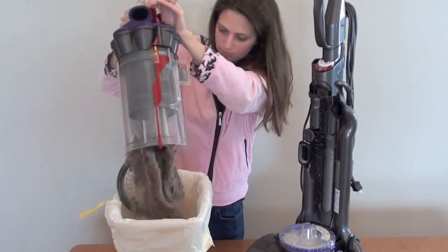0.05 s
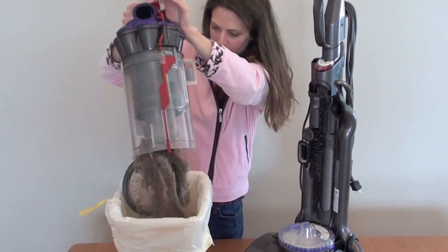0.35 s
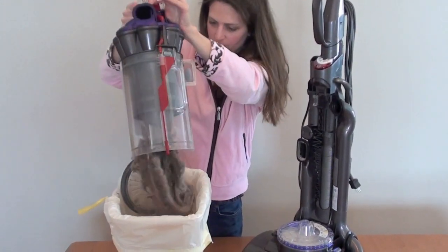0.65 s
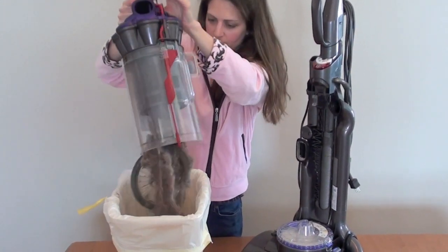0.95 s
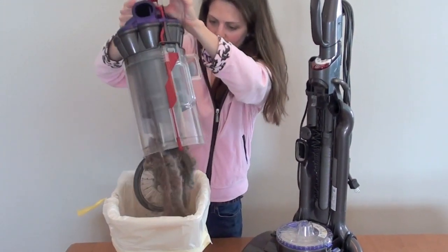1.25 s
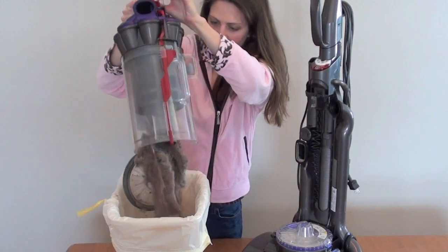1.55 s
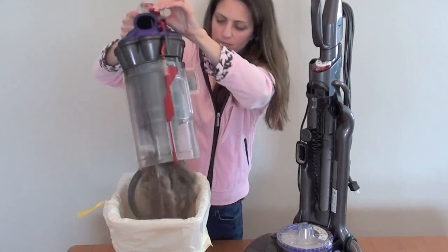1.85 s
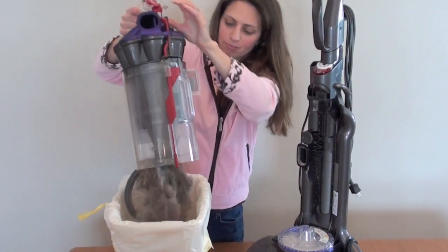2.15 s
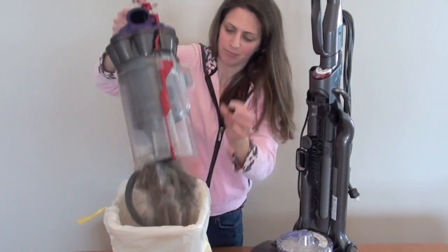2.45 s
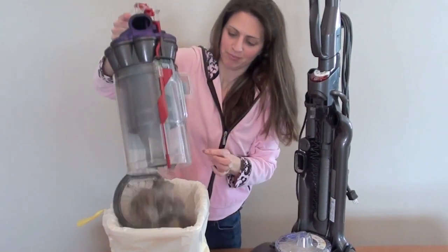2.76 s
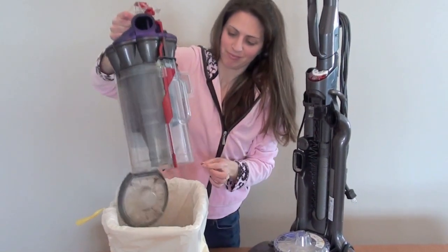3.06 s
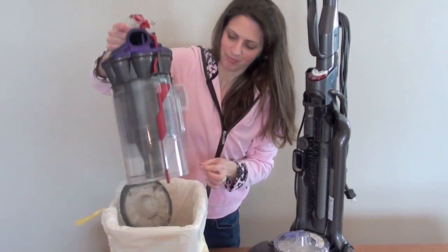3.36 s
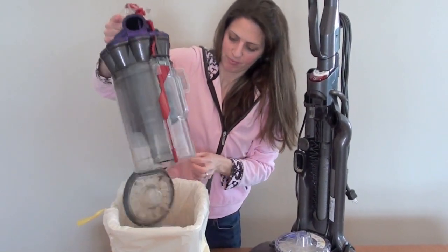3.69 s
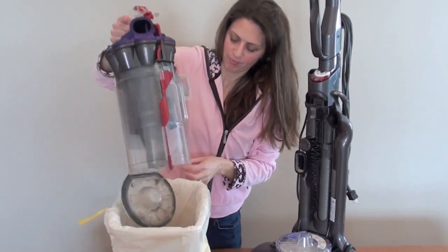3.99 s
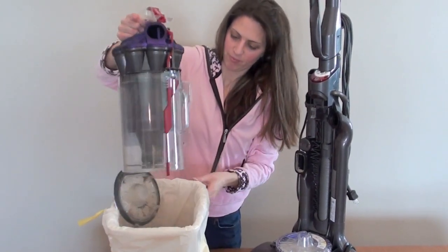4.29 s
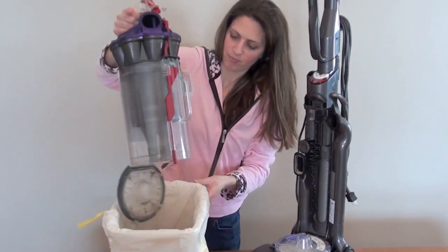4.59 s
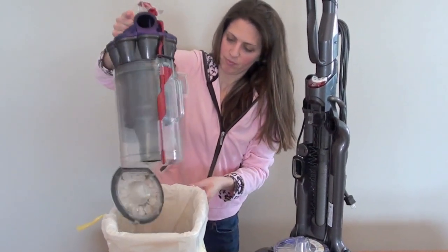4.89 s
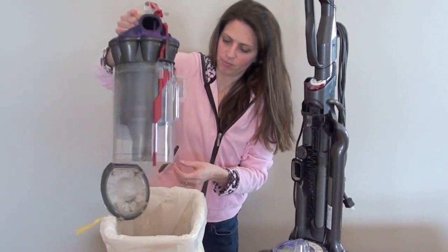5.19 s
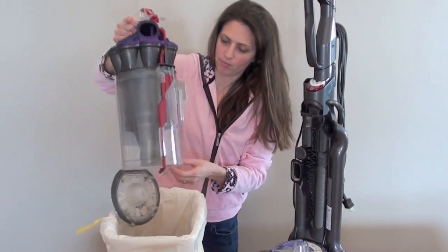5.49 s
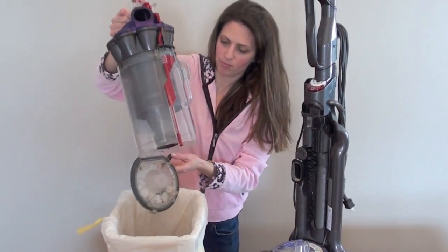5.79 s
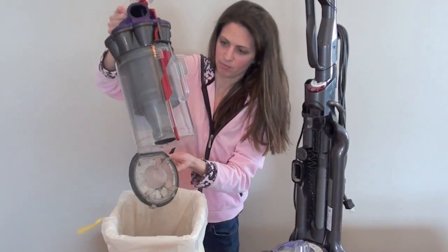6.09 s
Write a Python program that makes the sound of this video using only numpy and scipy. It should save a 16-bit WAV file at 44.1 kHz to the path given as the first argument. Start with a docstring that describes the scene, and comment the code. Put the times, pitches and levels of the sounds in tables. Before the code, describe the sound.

In a small, bare room, a hand thumps a vacuum cleaner's plastic bin while a clump of dust and hair hisses into a lined trash can. The catch snaps sharply several times and the open flap knocks and scrapes between further slaps. Then come eight hard, even slaps, each with a hollow boom and a rattle of loose parts. The handling, slightly left of the microphone, stops and leaves quiet room air.

```python
"""A small, bare room; a vacuum cleaner's plastic bin is emptied into a lined trash can, just left of the mic.
First a hand slaps the bin, its low modes boom, and a big clump of dust and hair hisses into the liner.
Then, between more slaps, fingers squeak, the catch snaps and the open flap knocks and scrapes.
From about 4 s come eight hard slaps; each frees a puff of dust and rattles the loose parts.
The handling stops, leaving room air and a faint high whine."""
import sys
import numpy as np
from scipy import signal
from scipy.fft import rfft, irfft, next_fast_len
from scipy.io import wavfile

SR = 44100
rng = np.random.default_rng(int(sys.argv[2]) if len(sys.argv) > 2 else 0)


def dump(signal):
    """Clip the signal to [-1, 1] and save it as 16-bit WAV at the path in sys.argv[1]."""
    limited = np.clip(np.atleast_2d(signal).T, -1, 1)
    pcm = np.round(limited * 32767).astype(np.int16)
    wavfile.write(sys.argv[1], SR, pcm)


N = 275184
TIME = np.arange(N) / SR
AGE = np.arange(int(.6 * SR)) / SR  # time since a blow, s
BRIEF = AGE[:SR // 6]  # the same, for short sounds

# hand blows on the bin: t/s, boom level/dB, smack level/dB
HAND_SLAPS = [(0.1383, -26, -28.5), (.354, -29.5, -35), (0.5421, -30.5, -33), (1.818, -24, -27.5),
              (2.0721, -28.5, -35.5), (2.8616, -38.5, -36), (3.055, -32, -32), (3.4964, -30.5, -35),
              (3.9457, -21.5, -22.5), (4.191, -25, -25.5), (4.3706, -25, -28), (4.6139, -22.5, -25),
              (4.855, -22, -22), (5.0834, -23, -22), (5.2849, -21.5, -21.5), (5.5038, -22, -24)]
# the catch snapping over: t/s, level/dB, hardness (0 dull, 1 or more sharp), lead of first touch/s
CATCH_SNAPS = [(1.7574, -13, 1.25, 0.013), (2.5473, -11, 0.97, 0.0058), (3.6027, -18, 1.18, .0175),
               (3.7843, -19.5, 1, 0.0094)]
# knocks of the flap and other loose parts: t/s, level/dB, hardness
FLAP_KNOCKS = [(0.169, -27, 1.67), (.785, -35.5, .9), (0.8165, -43.5, 2.3), (0.9168, -27.5, .2),
               (0.9816, -26.5, 0.14), (1.0056, -26.5, .1), (1.1375, -16, 0.12), (1.448, -27.5, 0.68),
               (1.6689, -29.5, 0.71), (1.9254, -12.5, 0.71), (2.0456, -27, 0.019), (2.2126, -12, 0.14),
               (2.4157, -37, 1.72), (2.7685, -18.5, 0.54), (2.7764, -20.5, 0.67), (2.8838, -24.5, 0.93),
               (2.979, -20.5, 0.27), (3.0229, -33.5, 1.76), (3.0733, -29.5, 1.5), (3.0869, -27.5, 1.57),
               (3.3637, -29.5, 1.04), (3.4359, -19, 0.37), (3.4450, -21.5, 0.36), (3.648, -18, 0.91),
               (3.8508, -13, 0.77)]
# plastic juddering on plastic: t/s, rise time/s, level/dB, hardness
PART_SCRAPES = [(1.681, 0.02, -35, 0.24), (1.756, 0.0066, -16, 0.98), (1.765, 0.036, -23.5, 0.69),
                (2.19, 0.01, -29.5, .15), (2.622, 0.029, -33, 0.67), (2.768, 0.0054, -24, 0.83),
                (2.978, 0.0087, -42, 0.34), (3.342, 0.033, -35, 0.67), (3.437, 0.0044, -28, 0.38),
                (3.6, 0.031, -25.5, 0.76), (3.79, 0.027, -25.5, 0.83), (3.838, 0.0092, -24, 0.81)]
# clumps of dust and hair sliding out: t/s, length/s, level/dB
DUST_SLIDES = [(0.145, 1.59, -34.5), (1.85, 3.9, -46), (2.93, 0.63, -45.5), (4.45, 1.3, -45.5)]
# fingers slipping on the plastic: t/s, half length/s, f/Hz, width/Hz, level/dB
FINGER_SLIPS = [(0.918, 0.029, 1340, 260, -42.5), (0.975, 0.03, 680, 280, -43.5),
                (1.476, 0.02, 3330, 256, -48), (1.525, .03, 6800, 1800, -45.5)]
# soft low rustle under and between the blows: t/s, relative level/dB
RUSTLE_LEVELS = [(0.0, -34.5), (0.38, -44), (1.73, -57), (1.9, -34), (2.5, -43), (2.92, -40.5), (3.38, -45),
                 (3.6, -37.5), (3.89, -38.5), (4.6, -53), (5.42, -34), (5.9, -40)]
# low modes of the bin and the room around it: f/Hz, relative level/dB, t60/s
BOOM_MODES = [(88, -5, 0.47), (121, -1, 0.22), (131.6, -8, 0.095), (143.7, -4.5, 0.39), (179.8, -3.5, 0.27),
              (188, -12, 0.046), (206, -2.5, 0.12), (224.4, 0.5, 0.14), (234.4, -5.5, 0.42),
              (251, -13, 0.62), (284.8, -6, 0.41), (311, -13, 1), (463.4, -8.5, 0.69)]
# resonances of the bin's wall: f/Hz, width/Hz, weight/dB (compressed in shell)
SHELL_MODES = [(668, 96, -18), (1390, 100, -18), (1900, 230, 6), (2815, 136, -16), (3420, 24, -31),
               (4240, 280, 8), (5150, 150, -22), (5470, 240, -24), (7300, 500, 26), (8020, 590, -8)]
# reverberation of the room: f/Hz, t60/s
ROOM_DECAY = [(150, 0.61), (500, 0.61), (2000, 0.59), (5000, 0.41), (9000, 0.35), (16000, 0.4)]

# spectra and filter curves, all: f/Hz, relative level/dB
PALM_COUPLING = [(30, -5), (62, -14.5), (80, -23.5), (110, 0.5), (240, 2.5), (330, -10.5), (480, -9.5),
                 (900, -44), (2000, -61)]  # share of the boom that a soft palm excites and the bin radiates
SMACK_SPECTRUM = [(150, -26), (330, -3.5), (450, -1.5), (530, -8), (660, 0.5), (850, -2), (1100, -4.5),
                  (1400, -6.5), (2500, -9.5), (6000, -74)]  # palm on the wall
CRACK_SPECTRUM = [(200, 0), (700, -7.5), (1200, 4), (2000, 10), (3000, 8), (4200, 1), (7700, 3),
                  (10000, -7), (16000, -21)]  # loose parts jolted by a slap
RATTLE_SPECTRUM = [(150, -15.5), (400, -2), (1000, -8.5), (1900, -0.5), (2800, -1), (3500, -9), (6000, -5),
                   (7900, -4), (10000, -12), (16000, -29.5)]  # loose parts bouncing afterwards
CONTACT_SPECTRUM = [(100, -20), (400, -11), (700, -4.5), (1100, 4), (1900, 4.5), (2900, 5.5), (3600, -1),
                    (5500, -3), (7800, -3.5), (10000, -13), (16000, -33)]  # plastic on plastic
DULL_COLOUR = [(420, -2), (660, 11.5), (850, 3), (1100, 2), (2700, -6), (6500, -6), (13000, -14.5)]  # a contact of hardness 0
SHARP_COLOUR = [(420, 0), (660, -5.5), (850, -11), (1100, -2.5), (2700, -1), (6500, 3.5), (13000, 6)]  # a contact of hardness 1
DUST_SPECTRUM = [(500, -4), (2000, 2), (4000, -0.5), (7500, 4.5), (10000, -3.5), (16000, -21.5)]  # dust and grit landing in the liner
RUSTLE_SPECTRUM = [(90, -10), (230, 6.5), (330, -0.5), (650, -3.5), (1400, -3), (2200, -6), (4000, -9.5),
                   (9000, -16.5)]  # the soft low rustle
WALL_RETURN = [(5000, 0.5), (8500, -3.5), (11000, -8.5), (15000, -45)]  # share that the room's walls send back
AIR_SPECTRUM = [(25, 12), (55, -7), (120, 0.5), (250, 4), (600, 0), (2000, -5), (7000, -5), (10000, -11),
                (16000, -12.5)]  # room tone
TICK_SPECTRUM = [(3000, -15), (10000, 5), (16000, -21)]  # first instant of a contact
BASS_LOSS = [(40, -10), (130, -1)]  # a small, light wall radiates little bass


def slaps(full_smack_db=-21.5, full_crack_db=-21.5, full_rattle_db=-20.5):
    """The palm smacks the wall, the low modes boom, the loose parts crack and, after hard blows, rattle."""
    booms, blows = np.zeros(N), np.zeros(N)
    for start, boom_db, smack_db in HAND_SLAPS:
        force_db = smack_db - full_smack_db  # 0 for a full blow
        add(booms, start, amp(boom_db) * held(boom(force_db), 0.088))
        smack = shell(impact(.018, .07, ring_db=-9), SMACK_SPECTRUM)
        smack = bent(smack, lag=.007, corner_hz=480)
        crack = shell(impact(0.0072, 0.24, ring_db=-18.5), CRACK_SPECTRUM)
        rattle = chatter(rise=0.032, rate=600, spectrum=RATTLE_SPECTRUM)
        add(blows, start, amp(smack_db) * held(smack, 0.026))
        add(blows, start, amp(full_crack_db + 1.11 * force_db) * held(crack, 0.019))
        add(blows, start, amp(full_rattle_db + 2.18 * force_db) * held(rattle, 0.05))
    return booms, blows


def boom(force_db):
    """The low modes ring under the palm, in a slightly different balance each time."""
    modes = sum(amp(db + rng.normal(0, 1)) * fade(t60) * np.cos(2 * np.pi * hz * AGE)
                for hz, db, t60 in BOOM_MODES)
    depth = [(125, 2.5 + 0.39 * force_db), (200, 0)]  # sharper blows also shake the deepest modes
    thud = coloured(modes, lambda hz: along(PALM_COUPLING, hz) + along(depth, hz))
    return bent(thud, lag=0.01337, corner_hz=600)


def catch_and_flap(touch_db=-5.5, touch_softer=0.17):
    """The catch touches lightly and snaps, the flap knocks against the bin, sliding parts judder."""
    out = np.zeros(N)
    for start, db, hardness, lead in CATCH_SNAPS:
        add(out, start - lead, amp(db + touch_db) * contact(hardness - touch_softer))
        add(out, start, amp(db) * contact(hardness))
    for start, db, hardness in FLAP_KNOCKS:
        add(out, start, amp(db) * contact(hardness))
    for start, rise, db, hardness in PART_SCRAPES:
        judder = chatter(rise, rate=1000, spectrum=CONTACT_SPECTRUM)
        add(out, start, amp(db) * held(hardened(judder, hardness), rise))
    return out


def contact(hardness):
    """Plastic strikes plastic and rings briefly; the highest treble is only in the first instant."""
    ring = shell(impact(0.0079, 0.059, ring_db=6.5), CONTACT_SPECTRUM)
    tick = coloured(impact(0.0085, .04, ring_db=-30), lambda hz: along(TICK_SPECTRUM, hz))
    return hardened(held(ring, 0.0028), hardness) + amp(-19.5) * held(tick, 0.002)


def impact(crack_t60, ring_t60, ring_db, attack_s=0.00053):
    """A very short crack, then the dense ringing of the plastic."""
    envelope = fade(crack_t60, BRIEF) + amp(ring_db) * fade(ring_t60, BRIEF)
    return rng.standard_normal(len(BRIEF)) * envelope * (1 - np.exp(-BRIEF / attack_s))


def chatter(rise, rate, spectrum, contact_t60=0.01, steepness=1.44):
    """Loose parts bounce in a flurry that swells and dies; each contact rings for an instant."""
    progress = (BRIEF / rise) ** steepness
    bounces = grains(len(BRIEF), rate, spread_db=0) * progress * np.exp(-progress)
    power = signal.lfilter([1], [1, -fade(contact_t60, 1 / SR) ** 2], bounces ** 2)
    return shell(np.sqrt(power) * rng.standard_normal(len(BRIEF)), spectrum)


def hardened(x, hardness):
    """A soft contact sounds hollow, a hard one thin and bright."""
    softness = 1 - hardness
    return coloured(x, lambda hz: softness * along(DULL_COLOUR, hz) + hardness * along(SHARP_COLOUR, hz))


def shell(x, spectrum, limit_db=4):
    """The bin's wall radiates a broad colour, its resonances standing out by up to limit_db."""
    def gain_db(hz):
        peaks = sum(amp(weight / 4) * resonance(hz, centre, width) for centre, width, weight in SHELL_MODES)
        return along(spectrum, hz) + along(BASS_LOSS, hz) + limit_db * np.tanh(6 * peaks / limit_db)
    return coloured(x, gain_db)


def bent(x, lag, corner_hz):
    """Bending waves are slower at low pitch, so the thud arrives up to lag seconds after the crack."""
    return filtered(x, lambda hz: np.exp(-2j * np.pi * lag * corner_hz * np.arctan(hz / corner_hz)))


def dust(grit_db=3, puff_s=0.3, puff_db=-32.5):
    """Dust hisses into the liner with grit ticking in it: whole clumps, and a puff after each slap."""
    puffs = [(start, puff_s, smack_db + puff_db) for start, _, smack_db in HAND_SLAPS]
    power = sum((amp(db) * slide(start, length)) ** 2 for start, length, db in list(DUST_SLIDES) + puffs)
    hiss = unit(rng.standard_normal(N))
    grit = amp(grit_db) * unit(grains(N, rate=380, spread_db=5))
    return np.sqrt(power) * unit(coloured(hiss + grit, lambda hz: along(DUST_SPECTRUM, hz)))


def slide(start, length, attack_s=0.013, taper=1.57):
    """Flow of one lot of dust: a quick start, then it runs dry."""
    age = np.maximum(TIME - start, 0)
    return (1 - np.exp(-age / attack_s)) * np.maximum(1 - age / length, 0) ** taper


def rustle(trim_db=-8):
    """Soft low rustle under and between the blows: lingering ring and handling noise."""
    level_db = np.interp(TIME, *np.transpose(RUSTLE_LEVELS)) + trim_db
    texture = grains(N, rate=3000, spread_db=0)
    return amp(level_db) * unit(shell(texture, RUSTLE_SPECTRUM))


def squeaks():
    """Fingers slip on the plastic in brief, thin squeals that swell and fade."""
    out = np.zeros(N)
    middle = AGE[-1] / 2
    for peak_time, half_length, centre, width, db in FINGER_SLIPS:
        tone = filtered(rng.standard_normal(len(AGE)), lambda hz: resonance(hz, centre, width))
        swell = np.exp(-((AGE - middle) / half_length) ** 2)
        add(out, peak_time - middle, amp(db) * held(tone * swell, half_length))
    return out


def room(x, wet_db, side_db, stretches=14):
    """The walls answer almost alike on both channels; a fresh random tail per stretch keeps it smooth."""
    mid, side = np.zeros(N), np.zeros(N)
    for span in np.array_split(np.arange(N), stretches):
        for track, tail in zip((mid, side), room_tail()):
            add(track, span[0] / SR, signal.fftconvolve(x[span], tail))
    pair = np.array([mid + amp(side_db) * side, mid - amp(side_db) * side])
    return filtered(pair, lambda hz: amp(wet_db + along(WALL_RETURN, hz)))


def room_tail(build_s=0.00067):
    """Mid and side reverberation, each frequency dying at its own speed."""
    hz, t, bands = signal.stft(rng.standard_normal((2, len(AGE))), SR, nperseg=256)
    bands = bands * fade(along(ROOM_DECAY, hz)[:, None], t)
    tails = signal.istft(bands, SR, nperseg=256)[1][:, :len(AGE)]
    tails = tails * (1 - np.exp(-AGE / build_s))
    return tails / np.linalg.norm(tails[0])


def room_tone(air_db=-53, whine_db=-64.5, whine_hz=8380):
    """Quiet room air and a faint, wavering high whine."""
    mid, side = [unit(coloured(rng.standard_normal(N), lambda hz: along(AIR_SPECTRUM, hz)))
                 for _ in range(2)]
    air = np.array([mid + amp(-12.5) * side, mid - amp(-10) * side])
    whine = unit(filtered(rng.standard_normal(N), lambda hz: resonance(hz, whine_hz, width=70)))
    return amp(air_db) * air + amp(whine_db) * whine


def amp(db):
    """Decibels to gain."""
    return 10 ** (np.asarray(db) / 20)


def unit(x):
    """Scale to rms 1."""
    return x / np.sqrt(np.mean(x ** 2) + 1e-20)


def held(x, seconds):
    """Scale a blow to the energy of rms 1 held for so long."""
    return x / np.sqrt(np.sum(x ** 2) / (seconds * SR) + 1e-20)


def fade(t60, t=AGE):
    """Exponential decay, 60 dB in t60 seconds."""
    return np.exp(-np.log(1000) * t / t60)


def resonance(hz, centre, width):
    """A peak of height 1, width Hz wide at half height."""
    return 1 / (1 + (2 * (hz - centre) / width) ** 2)


def along(points, hz):
    """Read a curve of (f/Hz, value) points on a log frequency axis."""
    freqs, values = np.transpose(points)
    return np.interp(np.log(hz + 1), np.log(freqs), values)


def filtered(x, response):
    """Filter by a complex response of frequency."""
    size = next_fast_len(x.shape[-1] + 8192, True)
    spectrum = rfft(x, size) * response(np.fft.rfftfreq(size, 1 / SR))
    return irfft(spectrum, size)[..., :x.shape[-1]]


def coloured(x, gain_db, size=4096):
    """Causal (minimum-phase) filter from a dB function of frequency."""
    gain = amp(gain_db(np.fft.rfftfreq(size, 1 / SR)))
    cepstrum = irfft(np.log(gain))
    cepstrum[1:size // 2] *= 2
    cepstrum[size // 2 + 1:] = 0
    impulse = irfft(np.exp(rfft(cepstrum)))
    return signal.fftconvolve(x, impulse)[:len(x)]


def grains(count, rate, spread_db):
    """Random tiny impacts, rate a second, their levels scattered by spread_db."""
    hits = rng.random(count) < rate / SR
    return hits * rng.choice([-1, 1], count) * amp(spread_db * rng.standard_normal(count))


def add(track, seconds, sound):
    """Mix a sound in at the given time."""
    start = max(round(seconds * SR), 0)
    track[start:start + len(sound)] += sound[:N - start]


def scene():
    """The bin stands a little left of the microphone; the handling stops after the last slap."""
    booms, blows = slaps()
    handling = (dust() + rustle()) * np.interp(TIME, [5.6, 5.85], [1, 0])
    bin_sound = blows + catch_and_flap() + squeaks() + handling
    reverb = room(bin_sound, wet_db=-1.5, side_db=-13) + room(booms, wet_db=-14, side_db=-11.5)
    pan = amp([[.3], [-.3]])
    return (bin_sound + booms + reverb) * pan + room_tone()


def record(dry):
    """The stereo microphone drops the deepest bass and keeps nothing above its band limit."""
    low_hz, top_hz = 48, 16300
    low_cut = signal.butter(3, low_hz, "high", fs=SR, output="sos")
    return filtered(signal.sosfilt(low_cut, dry), lambda hz: hz < top_hz)


dry = scene()
out = record(dry)
dump(out)
```